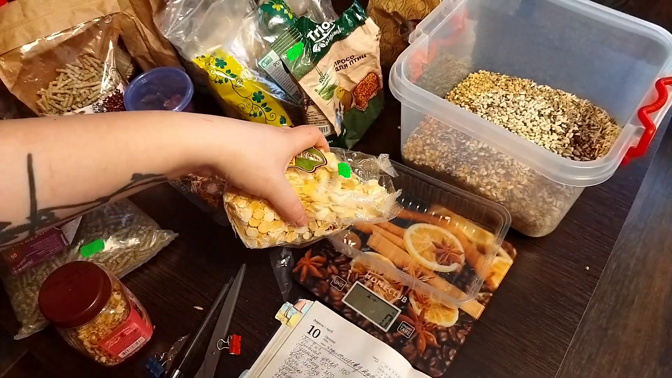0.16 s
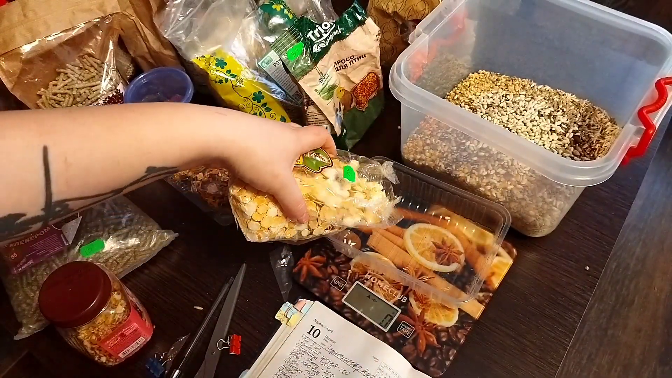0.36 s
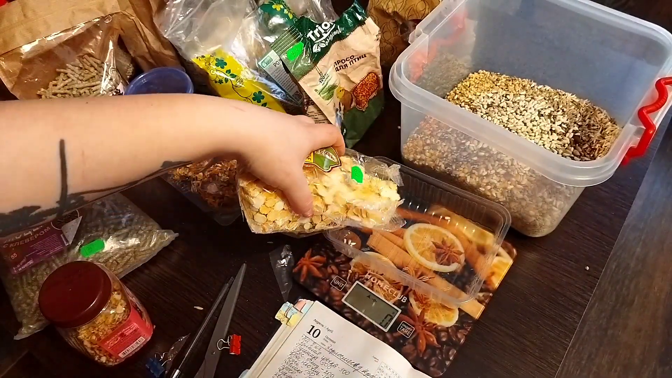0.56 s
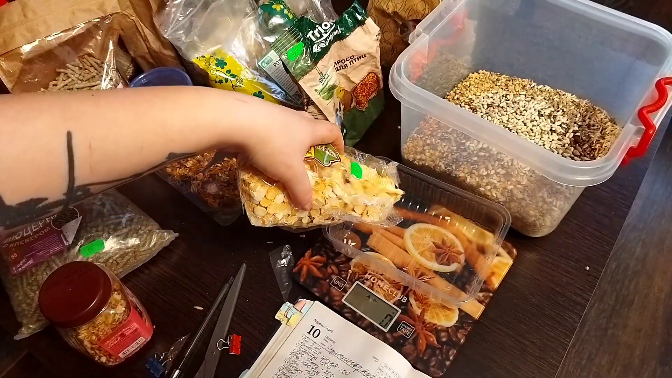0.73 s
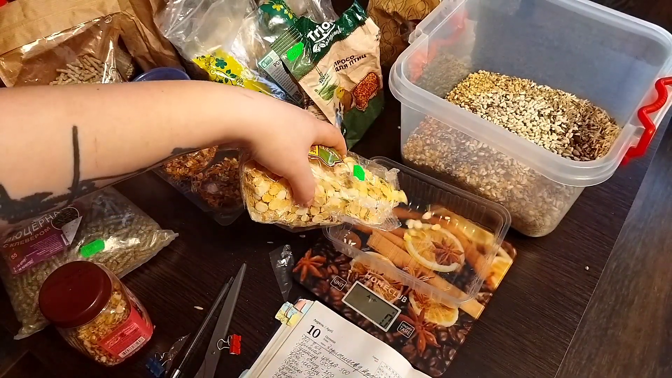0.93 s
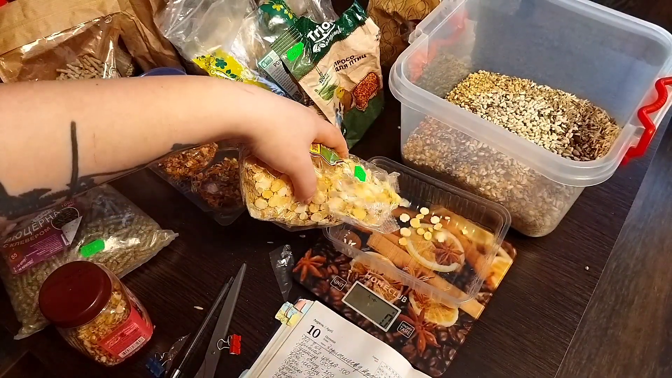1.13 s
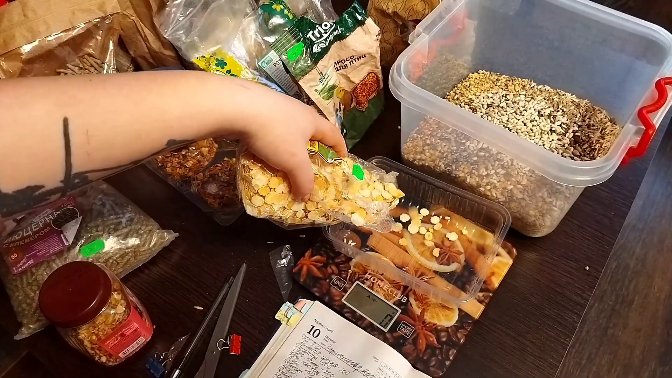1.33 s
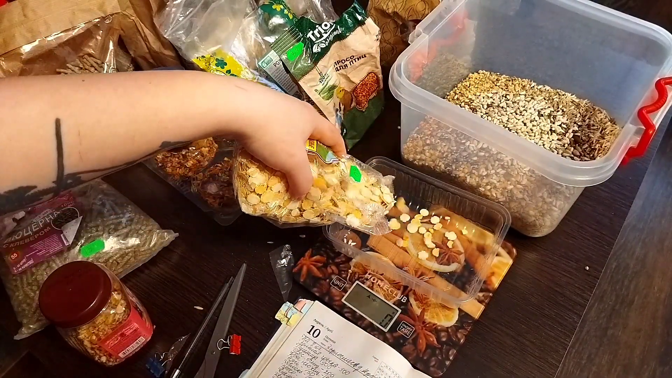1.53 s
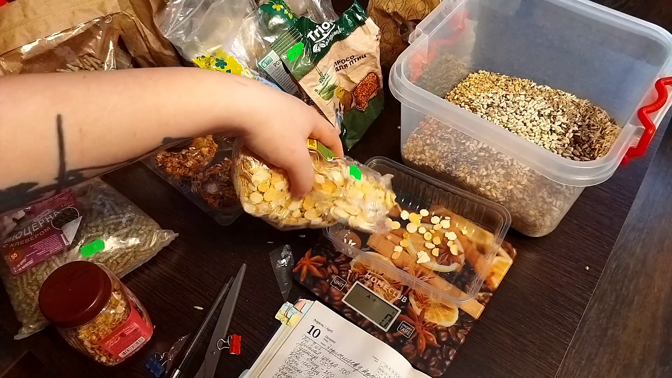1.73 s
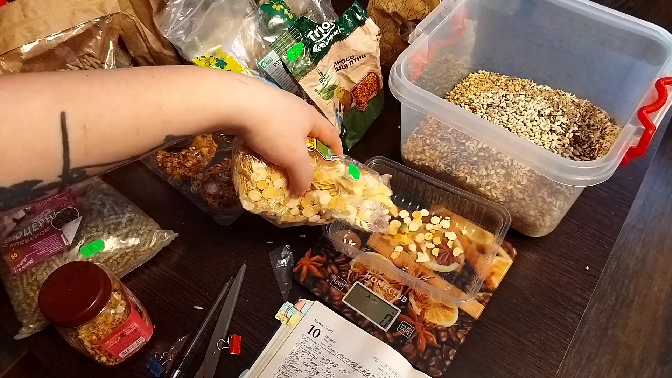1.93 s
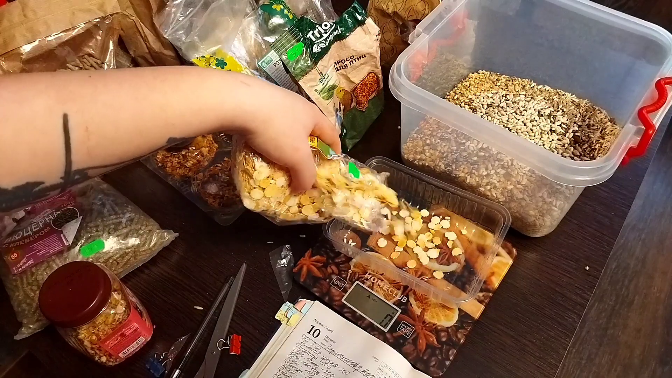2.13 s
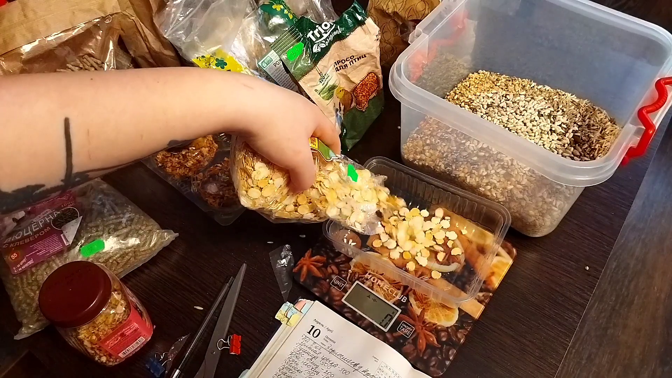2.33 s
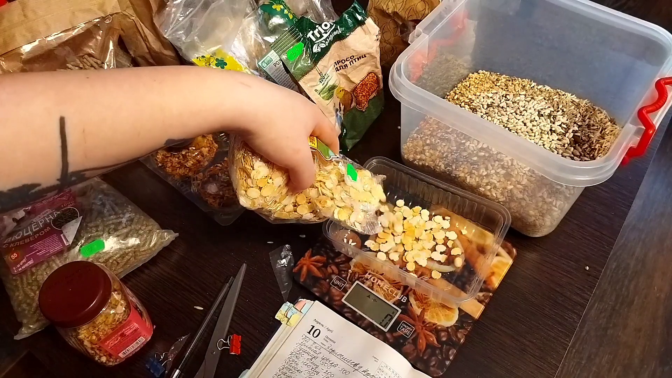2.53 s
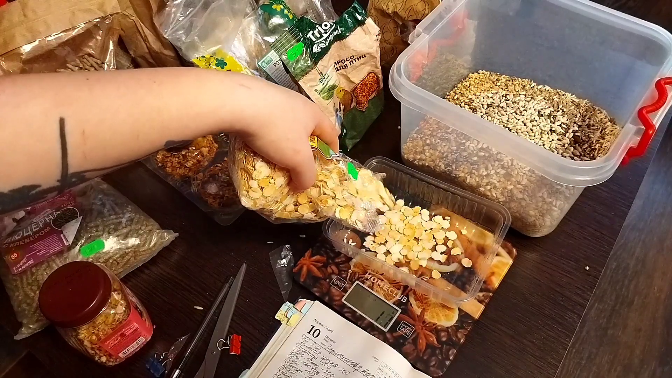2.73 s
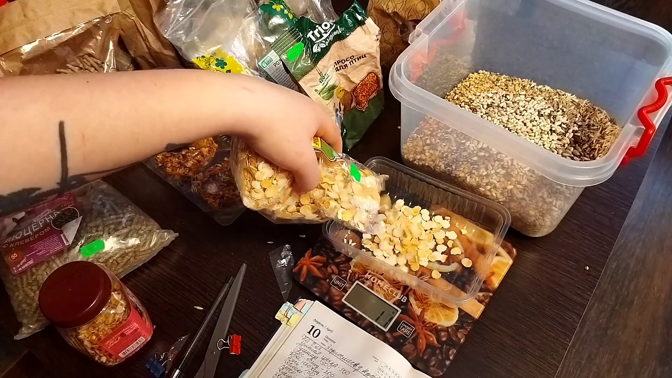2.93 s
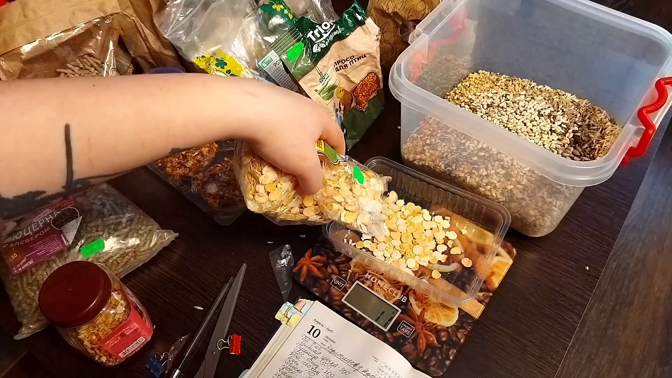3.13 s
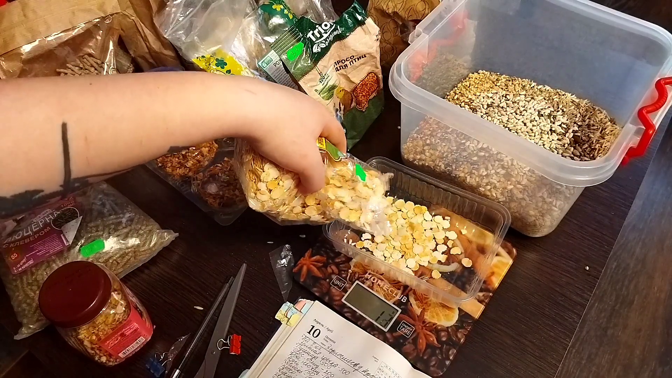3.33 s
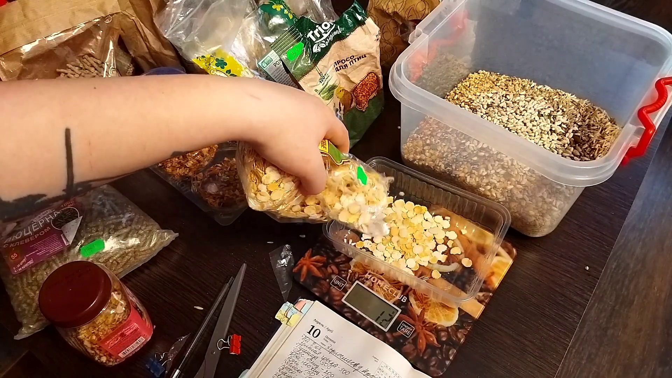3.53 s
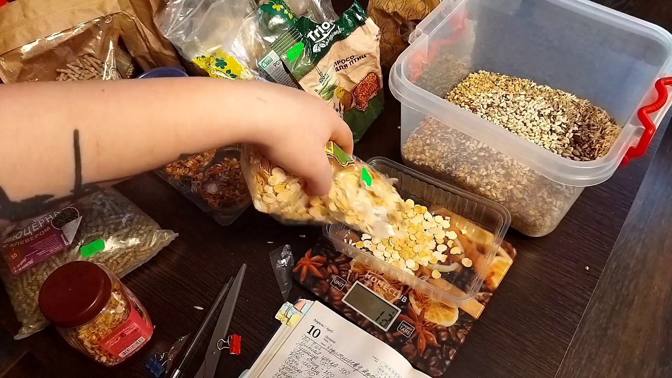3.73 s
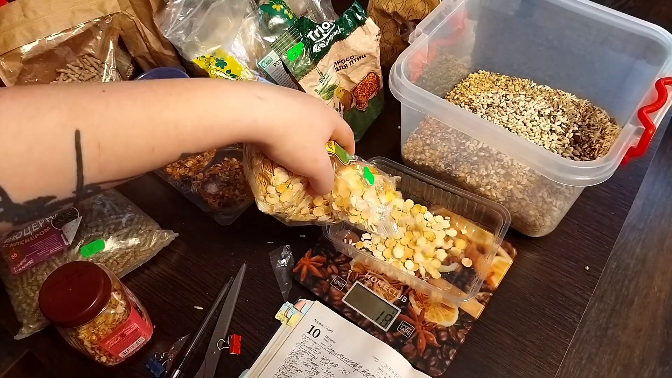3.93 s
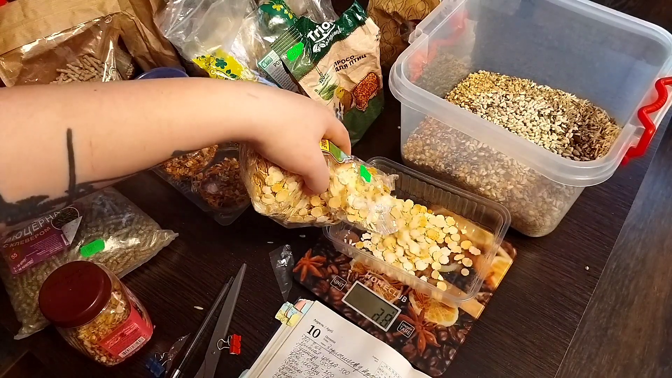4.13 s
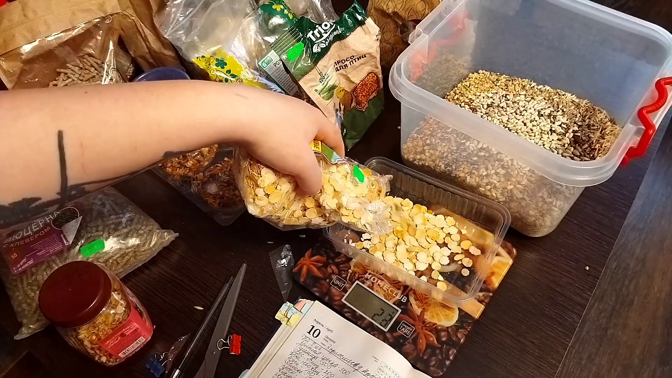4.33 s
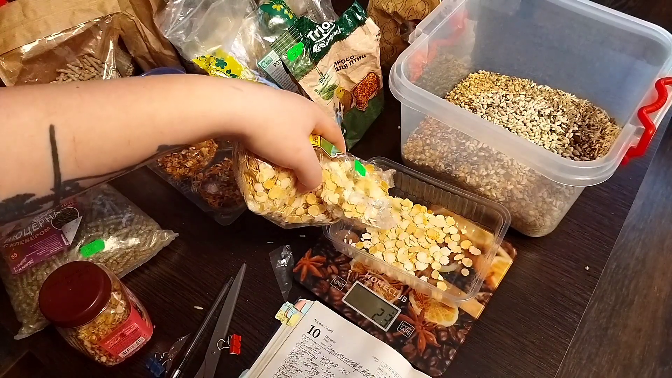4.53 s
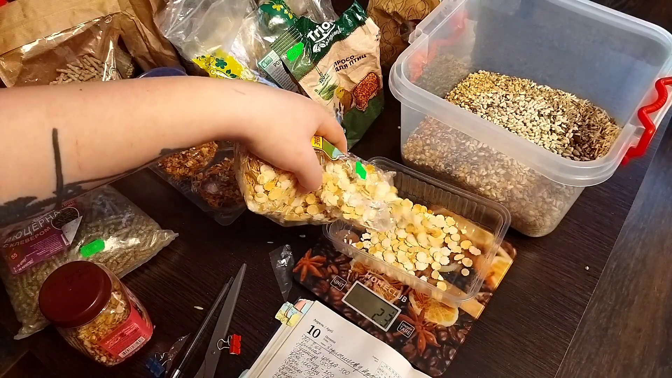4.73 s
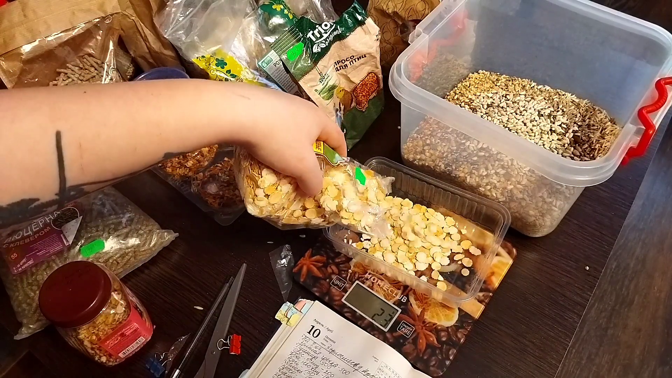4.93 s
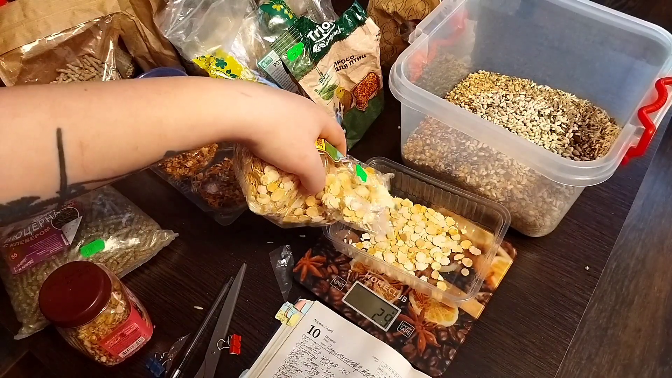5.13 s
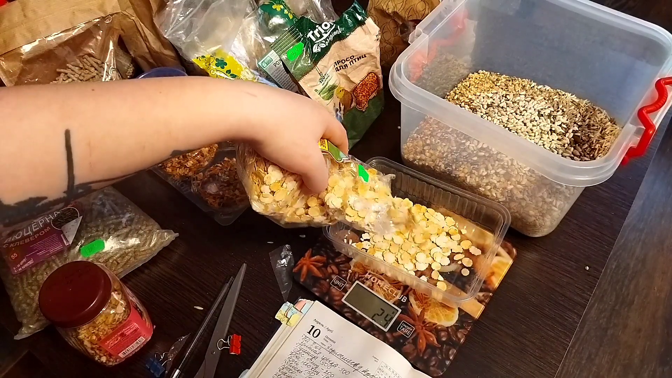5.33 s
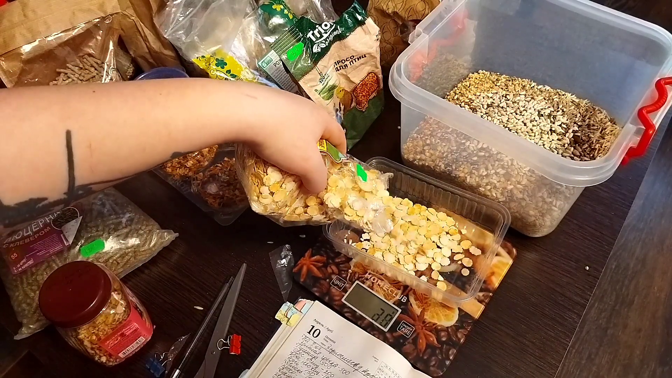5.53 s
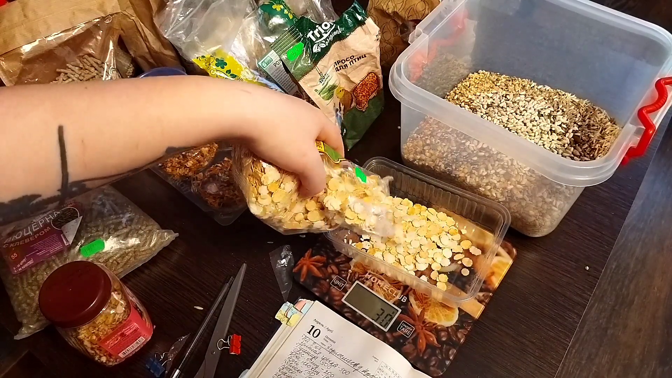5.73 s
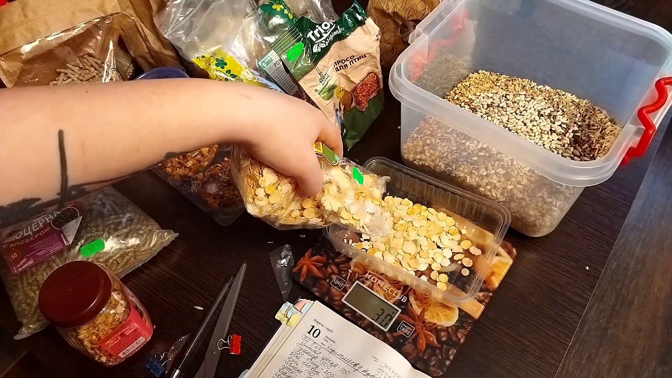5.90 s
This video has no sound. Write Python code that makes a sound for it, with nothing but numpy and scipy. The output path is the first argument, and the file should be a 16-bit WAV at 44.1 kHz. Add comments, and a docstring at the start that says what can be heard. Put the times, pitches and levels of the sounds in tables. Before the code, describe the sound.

Dry flakes are shaken from a stiff, crinkly plastic bag into a thin plastic tray, heard close up in stereo in a small room with a short, diffuse reverberation. For the first 0.9 seconds the sound is quiet: light snaps, a thin trickle of crackle, flakes shifting dully inside the bag and a few soft low bumps. At about 0.9 seconds hard shaking begins with a tight cluster of loud, dry snaps. Irregular bursts follow, each with sharp clicks of film and landing flakes and a surge of fine crackle that holds briefly and dies away, densest from about 1.9 to 2.8 seconds. After 3 seconds the snaps thin out, with a smaller swell near 3.8 to 4.2 seconds. From 4.3 to 6 seconds only weak, brighter crinkles and occasional small ticks remain. Faint steady noise lies underneath throughout.

```python
"""A hand tips and squeezes a stiff plastic bag, shaking dry flakes into a thin plastic tray in a small room.
Over faint noise and a thin trickle of crackle, flakes shift dully inside the bag and the first light snaps and
soft bumps come. From about one second, hard shakes bring loud snaps of film and landing flakes, and each sets off
a surge of fine crackle that holds and dies away; after three seconds the snaps thin out and the surges weaken.
Contacts are shaped noise bursts with a pitch of their own; shifting and bumps are muffled and band-passed noise."""
import sys
import numpy as np
from scipy import signal
from scipy.fft import rfft, irfft
from scipy.io import wavfile
from scipy.ndimage import uniform_filter1d

SR = 44100
rng = np.random.default_rng(int(sys.argv[2]) if len(sys.argv) > 2 else 0)


def dump_mix(stems):
    """Bounce the given channels to the path in sys.argv[1] as a 16-bit WAV at rate SR."""
    frames = np.atleast_2d(stems).T  # one column per channel
    limited = np.clip(frames, -1, 1)  # hard clip at full scale
    pcm = np.round(limited * 32767).astype(np.int16)
    wavfile.write(sys.argv[1], SR, pcm)


N = 262918
TIME = np.arange(N) / SR
SPOTS = 4   # places on bag and tray where contacts happen


def from_db(db):
    """Decibels to gain."""
    return 10 ** (np.asarray(db) / 20)


def rms_one(x):
    """Scale to unit power."""
    return x / np.sqrt(np.mean(x ** 2) + 1e-20)


def at_hz(points, hz):
    """Read a curve over frequency on a log-frequency axis."""
    known_hz, values = np.transpose(points)
    return np.interp(np.log(np.maximum(hz, 1)), np.log(known_hz), values)


def coloured(x, spectrum, size=2048):
    """Causal (minimum-phase) filter of the given colour; white noise keeps its power."""
    gain = rms_one(from_db(at_hz(spectrum, np.fft.rfftfreq(size, 1 / SR))))
    # folding the cepstrum onto positive times makes the filter minimum-phase
    cepstrum = irfft(np.log(gain)) * (1 + np.sign(np.fft.fftfreq(size)))
    response = irfft(np.exp(rfft(cepstrum)))
    return signal.oaconvolve(x, response[None], axes=1)[:, :N]


def resonate(x, modes):
    """Each resonance lifts its own band and rings on briefly."""
    for hz, width_hz, db in modes:
        b, a = signal.iirpeak(hz, hz / width_hz, fs=SR)
        x = x + (from_db(db) - 1) * signal.lfilter(b, a, x)
    return x


def stereo_noise(shape, alike):
    """Left and right white noise with a given correlation."""
    shared, *own = rng.standard_normal((3, *shape))
    alike = np.clip(alike, 0, 1)
    return np.sqrt(alike) * shared + np.sqrt(1 - alike) * np.array(own)


# Colour of the steady background noise. Each row: frequency in Hz, relative level in dB.
BACKGROUND_COLOUR = [(25, -5), (50, -11), (100, -2), (300, -8.5), (1000, -3), (4000, -37), (16000, -13.5)]


def background_noise(level_db):
    """Steady coloured noise, only slightly alike on the two sides."""
    return from_db(level_db) * coloured(stereo_noise((N,), alike=0.23), BACKGROUND_COLOUR)


# Surges of crackle, one per shake or squeeze.
# Each row: start in seconds, level in dB before trim, hold in seconds, brightness in dB per octave.
SHAKE_SURGES = [(0.02, -47, 0.018, -3.5), (0.095, -39, 0.05, -3), (0.348, -49, 0.047, -2),
                (0.439, -49, 0.1905, -0.5), (0.665, -43, 0.016, 1), (0.774, -51, .08, -0.5),
                (0.963, -32, .075, -1.5), (1.115, -39, 0.0503, -4.5), (1.2, -37.5, .06, -0.5),
                (1.355, -37, 0.0452, 1), (1.477, -44, 0.029, -4.5), (1.583, -30, 0.023, 1),
                (1.698, -30, 0.026, 0), (1.795, -42, 0.0654, 2), (1.90, -42, .07, 0),
                (1.985, -25, 0.039, 0.5), (2.148, -41, .02, -3), (2.185, -33, 0.031, 0),
                (2.247, -28, 0.024, 1.5), (2.315, -24, 0.071, 2), (2.44, -30, .08, 1.5),
                (2.56, -34, .1, 1.5), (2.685, -38.5, .14, 0), (2.926, -29, 0.0797, 2.5),
                (3.05, -31, .055, 1), (3.198, -42, 0.029, 0), (3.3, -42, 0.039, 0), (3.375, -41, 0.0512, 0),
                (3.476, -47, 0.018, 3.5), (3.595, -40, 0.0703, 4), (3.69, -39, .04, -0.5),
                (3.775, -39, .04, -0.5), (3.835, -35, .15, 1.5), (3.99, -31.5, .09, 2),
                (4.155, -36, 0.061, 2), (4.3, -43, .12, 1.5), (4.471, -45, 0.025, 3.5),
                (4.565, -45, .03, 1), (4.699, -46.5, 0.018, 4), (4.815, -41, 0.084, 3),
                (5.026, -36, .04, 1), (5.13, -48, 0.034, 0), (5.33, -39.5, 0.038, 5),
                (5.395, -41, .08, 3.5), (5.51, -46, .04, 5), (5.618, -42, .04, 2), (5.692, -45, 0.019, -1),
                (5.755, -46, 0.018, -0.5), (5.835, -40, 0.0275, 1.5)]
SURGE_RISE_S, SURGE_FALL_DB_PER_S = .012, 140
TRICKLE_DB, TRICKLE_TILT_DB = -55, 0.5   # the bag creeps and a few flakes drop between shakes


def flow():
    """Level and brightness of the stream: each shake swells quickly, holds and dies away, over a thin trickle."""
    power = np.full(N, from_db(TRICKLE_DB) ** 2)
    weighted_tilt = TRICKLE_TILT_DB * power
    for start, db, hold_s, tilt_db in SHAKE_SURGES:
        first = int(start * SR)
        span = slice(first, first + SR)
        age = TIME[span] - start
        rise = np.clip(age / SURGE_RISE_S, 0, 1)
        fall_db = SURGE_FALL_DB_PER_S * np.maximum(age - hold_s, 0)
        surge = (rise * from_db(db - fall_db)) ** 2
        power[span] += surge
        weighted_tilt[span] += tilt_db * surge
    return 10 * np.log10(power), weighted_tilt / power


def ticks(s, db, tilt_db, decay_s, ring_hz, ring_db, alike, ragged_db, rise_s, size, lead_count=24):
    """Each contact is a sudden flutter of thin, stiff material that dies in milliseconds."""
    age = np.maximum(np.arange(size) - lead_count, 0) / SR
    fade = (1 - np.exp(-age / rise_s)) * np.exp(-age / decay_s[:, None])
    # a fold gives way in several uneven jerks
    jerks = rms_one(uniform_filter1d(rng.standard_normal(fade.shape), size=30))
    burst = stereo_noise(fade.shape, alike) * fade * from_db(ragged_db * jerks)
    # level the energy of each burst to suit its decay
    energy = (burst ** 2).sum(-1).mean(0)
    burst *= np.sqrt(decay_s * SR / 2 / energy)[:, None]
    hz = np.fft.rfftfreq(size, 1 / SR)
    octaves = np.log2(np.clip(hz, 1000, 14000) / 3800)   # brightness pivots here
    # each facet or flake favours a pitch set by its size
    ring = ring_db * np.exp(-(np.log2((hz + 1) / ring_hz[:, None]) / .5) ** 2)
    spectra = rfft(burst) * from_db(db[:, None] + tilt_db[:, None] * octaves + ring)
    # the sound tends to reach the left port a little later
    delay_s = rng.normal(5.4e-5, 2e-5, (len(s), 1))
    spectra[0] *= np.exp(-2j * np.pi * hz * delay_s)
    where = (s[:, None] * SR).astype(int) + np.arange(size) - lead_count
    where = np.maximum(where, 0).ravel()
    return np.array([np.bincount(where, side.ravel(), N)[:N] for side in irfft(spectra)])


# Colour of the fine crackle. Each row: frequency in Hz, relative level in dB.
FINE_COLOUR = [(100, -31), (250, -17.5), (550, -13), (750, 2.5), (1300, 2), (1800, -4.5), (2300, -1.5),
               (3200, -3), (4500, -2.5), (5400, -7), (7500, -10.5), (10000, -6.5), (16000, -10.5)]
# tiny contacts over all spots at that flow; the rise in flow that doubles them
CONTACTS_PER_S, AT_FLOW_DB, DOUBLING_DB = 1800, -30, 8


def crackle(flow_db, flow_tilt_db, gain_db, spread_db, decay_s):
    """Countless small creases and flakes at one spot, each with a size, brightness and ring of its own."""
    per_s = CONTACTS_PER_S * 2 ** ((flow_db - AT_FLOW_DB) / DOUBLING_DB)
    at = rng.random(N) < per_s / SPOTS / SR
    size, colour, length, pitch = np.clip(rng.standard_normal((at.sum(), 4)), -1.7, 1.7).T
    # the power of the stream is shared among its contacts
    share = rms_one(from_db(spread_db * size)) / np.sqrt(per_s[at] * decay_s / 2)
    db = flow_db[at] + gain_db + 20 * np.log10(share)
    tilt_db = flow_tilt_db[at] + 1.03 * colour
    decays_s = decay_s * from_db(1.9 * length)
    grains = ticks(TIME[at], db, tilt_db, decays_s, 4000 * 2 ** pitch, ring_db=7.0,
                   alike=0.47, ragged_db=3.5, rise_s=0.000071, size=192)
    return coloured(grains, FINE_COLOUR)


# Fader ride for the flakes shifting inside the bag. Each row: time in seconds, level in dB before swing and trim.
SHIFT_LEVEL = [(0.0, -57), (0.55, -58.5), (0.7, -61.5), (0.93, -62), (1.09, -64), (1.51, -60),
               (2.22, -54.5), (3.42, -63.5), (3.68, -57), (3.9, -55.5), (4.6, -66.5), (5.24, -62.5),
               (5.66, -67.5), (5.96, -67)]
# Dull colour of that shifting. Each row: frequency in Hz, relative level in dB.
MUFFLED_COLOUR = [(40, -19), (100, -18), (185, -14.5), (270, -4), (430, -2), (600, -6), (900, -19.5),
                  (1500, -4.5), (2600, -5.5), (5000, -19.5), (16000, -18)]
# share of each surge's swing that the shifting follows; the time it is judged over
SHIFT_FOLLOWS, SWING_SPAN_S = 0.36, 0.63


def shifting(flow_db, gain_db, lumpy_db):
    """Flakes slide over each other inside the bag in small muffled lumps, more with every shake."""
    swing_db = flow_db - uniform_filter1d(flow_db, size=int(SWING_SPAN_S * SR))
    s, ride_db = np.transpose(SHIFT_LEVEL)
    level = from_db(np.interp(TIME, s, ride_db) + SHIFT_FOLLOWS * swing_db + gain_db)
    wander = rms_one(uniform_filter1d(rng.standard_normal(N), size=300))
    lumps = rms_one(from_db(lumpy_db * wander))
    return coloured(stereo_noise((N,), alike=1.0) * lumps * level, MUFFLED_COLOUR)


# lesser snaps come at random over all spots and are as strong as the flow allows
STRAYS_PER_S, STRAY_ABOVE_FLOW_DB, STRAY_SPREAD_DB, STRAY_DECAY_S = 20, 7.5, 5.5, .0012
STRAY_RING_HZ, STRAY_RING_OCTAVES = 2820, 1   # centre and spread of the pitch that a lesser snap favours


def stray_snaps(flow_db, flow_tilt_db):
    """Rows for the lesser snaps at one spot, taking strength and brightness from the flow."""
    at = rng.random(N) < STRAYS_PER_S / SPOTS / SR
    size, colour, pitch = rng.uniform(-0.95, 1, (3, N))[:, at]
    db = flow_db[at] + STRAY_ABOVE_FLOW_DB + STRAY_SPREAD_DB * size
    tilt_db = flow_tilt_db[at] + 0.83 * colour - 0.8
    ring_hz = STRAY_RING_HZ * 2 ** (STRAY_RING_OCTAVES * pitch)
    return np.c_[TIME[at], db, tilt_db, np.full(len(db), STRAY_DECAY_S), ring_hz]


# The loudest snaps of the film and flakes hitting the tray, dealt out over the spots by scene().
# Each row: start in seconds, level in dB before trim, brightness in dB per octave, decay in seconds, own ring in Hz.
LOUD_SNAPS = [(0.023, -24, 4, 0.0014, 2200.0), (0.0993, -22, 7, 0.0014, 1190),
              (0.277, -36, -4, 0.0021, 2100.0), (0.3626, -34.5, -6, 0.0009, 12130),
              (0.3808, -33, -4, 0.0019, 1605), (0.4841, -40, -11, 0.0022, 900.0),
              (0.5168, -34, 6.5, 0.00092, 11050), (0.6716, -32, 4, 0.0025, 1603),
              (0.9202, -16.5, -3.5, 0.0019, 3820), (0.9326, -25, -7.5, 0.0011, 4074),
              (0.9471, -15.5, 2.5, 0.0012, 1802), (0.9707, -16.5, -1.5, 0.0048, 5586),
              (0.9836, -10, 0.5, 0.0023, 1300.0), (1.0159, -11.5, -3, 0.00089, 6500.0),
              (1.0354, -13.5, 1.0, 0.0044, 1010), (1.1107, -23, 1, 0.0019, 4400.0),
              (1.1253, -8.5, -1.5, 0.00086, 1095), (1.1422, -9.5, 3.0, 0.0008, 1110),
              (1.2202, -22, -2, 0.0043, 3460), (1.2535, -17, 3.5, 0.00085, 6480),
              (1.327, -21, 0, 0.0034, 3720), (1.3638, -17, 0, 0.0015, 12930),
              (1.3828, -11.5, -2.5, 0.00052, 7030), (1.4403, -20.5, 0, 0.0017, 2810),
              (1.4773, -14, -2.0, 0.0015, 1160), (1.5426, -21, -1, 0.00086, 5560),
              (1.5594, -14.5, 0.5, 0.0013, 695.5), (1.5868, -7.5, 2, 0.0012, 800.0),
              (1.6522, -24, 0.0, 0.0011, 2200.0), (1.6673, -12.5, -1.0, 0.0011, 6520),
              (1.7037, -11.5, -2, 0.0013, 13980), (1.7184, -16.5, -0.5, 0.0045, 695),
              (1.8107, -22.5, 1.5, 0.004, 3000.0), (1.9444, -17, -1, 0.0015, 1593),
              (1.9562, -12, -1.0, 0.00074, 4400.0), (1.9804, -19, 0.5, 0.007, 2409),
              (1.9939, -14.5, -1.5, 0.0047, 2826), (2.0031, -9.5, 0.0, 0.00096, 5600.0),
              (2.0222, -17.5, 2, 0.0035, 3540), (2.0425, -19, 1.0, 0.0016, 700.0),
              (2.1557, -12.5, -0.5, 0.0009, 2410), (2.1904, -12.5, 2.5, 0.0016, 900.0),
              (2.2009, -12, -1.5, 0.0012, 1602), (2.2502, -16.5, 2, 0.0038, 1490),
              (2.2635, -18.5, 1.5, 0.0033, 3540), (2.3149, -20.5, 2.5, 0.0038, 4400.0),
              (2.3556, -12.5, 0.0, 0.0038, 796.6), (2.4038, -14.5, -4.5, 0.0016, 13000.0),
              (2.4435, -18, -1, 0.0037, 803), (2.61, -16.5, -1.5, 0.0011, 1907),
              (2.643, -16, 0.5, 0.0018, 900.0), (2.7255, -13, -2.5, 0.0016, 698.4),
              (2.7691, -15.5, 1.5, 0.0012, 1600.0), (2.8144, -19.5, 0.5, 0.0057, 2102),
              (2.9295, -21.5, 1.0, 0.0041, 1900.0), (3.0126, -25, -2, 0.003, 4086),
              (3.0657, -21, 0.0, 0.005, 2060), (3.2161, -18, -1.0, 0.001, 895),
              (3.3066, -19.5, 1.5, 0.0019, 1796), (3.4325, -24, -0.5, 0.0012, 14060),
              (3.5643, -26.5, 2.5, 0.0011, 2808), (3.8389, -21, -1, 0.0026, 1900.0),
              (3.898, -24.5, -1.5, 0.0019, 1000.0), (3.9153, -16.5, 2, 0.00084, 6498),
              (4.0201, -21.5, 4, 0.0037, 3476), (4.2759, -33, 3, 0.0022, 800.0),
              (4.3923, -30, 2.5, 0.0019, 702.5), (4.572, -30.5, 0.5, 0.0053, 795),
              (4.8232, -29.5, -2, 0.0053, 1000.0), (4.9849, -33, 0.5, 0.0063, 12080),
              (5.0678, -28, 3.5, 0.003, 799.5), (5.1369, -41.5, -6, 0.0027, 1902),
              (5.2547, -33, -1.5, 0.004, 14000.0), (5.703, -33.5, -1.5, 0.0029, 8265),
              (5.7601, -40.5, 7.5, 0.0051, 698), (5.8367, -26.5, 6, 0.0012, 1513),
              (5.8909, -39, -6.5, 0.0027, 1900.0)]
# Colour of the snaps. Each row: frequency in Hz, relative level in dB.
SNAP_TONE = [(100, -41), (250, -24), (550, -13.5), (750, -8.5), (1300, -2), (1800, -3.5), (2300, 0),
             (3200, -3.5), (4500, 0.5), (5400, -5.5), (7500, -7), (10000, -3.5), (16000, -10.5)]


def snaps(rows, gain_db, crease_db, crease_s, warning_s, count=4):
    """Loud buckles and single landings; one small crease gives way just before each, the others just after."""
    s, db, tilt_db, decay_s, ring_hz = np.transpose(rows)
    main = ticks(s, db + gain_db, tilt_db, decay_s, ring_hz, ring_db=6.0,
                 alike=0.36, ragged_db=3.5, rise_s=0.00019, size=1024)
    s, db, tilt_db, decay_s, ring_hz = np.repeat(rows, count, axis=0).T
    after_s = crease_s * rng.exponential(1, len(s))
    # the first crease of each group is the early, softer one
    after_s[::count] = -warning_s * rng.uniform(.5, 1.5, len(rows))
    db[::count] -= 2.0
    creases = ticks(s + after_s, db + crease_db, tilt_db, np.full(len(s), .0007), ring_hz, ring_db=-2.5,
                    alike=0.99, ragged_db=2.5, rise_s=0.00017, size=192)
    return coloured(main + creases, SNAP_TONE)


# Soft bumps of the full bag. Each row: start in seconds, peak level in dB before trim, pitch in Hz.
BAG_BUMPS = [(0.135, -36, 340), (0.48, -39, 494), (0.98, -40, 437), (1.186, -38, 321.7),
             (1.71, -37.5, 476.4), (2.105, -48, 278), (2.194, -39, 380), (3.462, -44, 317),
             (3.71, -40, 456.6), (3.784, -40, 350), (5.192, -48, 350), (5.344, -39, 354.4)]


def bumps(gain_db, octaves, decay_s):
    """A whole face of the bag flexes against the flakes: a short, low puff."""
    out = np.zeros(N)
    age = TIME[:SR // 10] / decay_s
    for s, db, hz in BAG_BUMPS:
        edges_hz = hz * 2 ** (octaves * np.array([-.5, .5]))
        band = signal.butter(2, edges_hz, "band", fs=SR, output="sos")
        puff = signal.sosfilt(band, rng.standard_normal(len(age)) * np.sqrt(age) * np.exp(-age))
        out[int(s * SR):][:len(age)] += from_db(db + gain_db) * puff / np.abs(puff).max()
    return out


# Reverb time of the small room. Each row: frequency in Hz, time to fall by 60 dB in seconds.
REVERB_TIME = [(150, 0.46), (1000, 0.2), (4000, 0.58), (9000, 0.043), (16000, 0.29)]


def room(x, wet_db, table_db, build_s=0.0016):
    """The direct sound, quick reflections off the table, then a diffuse tail, each band dying at its own rate."""
    age = TIME[:SR // 3]
    hz = np.fft.rfftfreq(len(age), 1 / SR)
    centres = np.geomspace(150, 16000, 6)
    tail = 0
    for centre, pick in zip(centres, np.eye(len(centres))):
        # long waves reach both ports alike
        noise = rfft(stereo_noise(age.shape, alike=1 / (1 + (centre / 900) ** 2)))
        band = irfft(noise * np.sqrt(at_hz(np.c_[centres, pick], hz)), len(age))
        tail = tail + band * from_db(-60 * age / at_hz(REVERB_TIME, centre))
    tail = rms_one(tail * (1 - np.exp(-age / build_s)))
    near = rms_one(stereo_noise(age.shape, alike=0.033) * age * np.exp(-age / 0.0024))
    response = (from_db(wet_db) * tail + from_db(table_db) * near) / np.sqrt(len(age))
    return x + signal.oaconvolve(x, response, axes=1)[:, :N]


# Resonances of the tray and the bag. Each row: frequency in Hz, width in Hz, lift in dB.
PLASTIC_MODES = [(469.8, 32, 7.5), (740, 66, 6), (833, 16, 4), (1276, 23, 0), (1297, 26, 2.5),
                 (1630, 63, 3.5), (2123, 50, 3.5), (3257, 57, 4), (3470, 24, 6.5), (4400, 1150, 3.5)]


def scene():
    """Contacts are spread over several spots of bag and tray, each with its own reflections."""
    flow_db, flow_tilt_db = flow()
    contacts = 0
    for spot in range(SPOTS):
        rows = np.vstack([LOUD_SNAPS[spot::SPOTS], stray_snaps(flow_db, flow_tilt_db)])
        loud = snaps(rows, gain_db=-3.5, crease_db=-12.5, crease_s=.007, warning_s=0.005)
        fine = crackle(flow_db, flow_tilt_db, gain_db=-7.0, spread_db=5.0, decay_s=0.00094)
        contacts = contacts + room(loud + fine, wet_db=-7.0, table_db=-7.0)
    inside_bag = shifting(flow_db, gain_db=8.0, lumpy_db=4.0)
    inside_bag = inside_bag + bumps(gain_db=-0.5, octaves=1.0, decay_s=0.0074)
    background = background_noise(level_db=-58.5)
    return resonate(contacts, PLASTIC_MODES) + room(inside_bag, wet_db=-8.5, table_db=-8.0) + background


# Resonances of the left and right microphone ports. Each row: frequency in Hz, width in Hz, lift in dB.
LEFT_PORT_MODES = [(268, 110, 2), (1270, 320, 1), (3240, 250, 1), (8930, 920, 7.5)]
RIGHT_PORT_MODES = [(514, 160, 1.4), (3760, 210, 1.3), (6447, 420, 6.45), (12060, 490, 5)]
BASS_CUT_HZ, TOP_CUT_HZ = 112, 16000
PEAK_LIMIT = .9   # full scale is 1


def record(dry):
    """Each microphone port adds its own colour; the deep bass is cut, the highest peaks are rounded, the top is cut."""
    heard = np.array([resonate(dry[0], LEFT_PORT_MODES), resonate(dry[1], RIGHT_PORT_MODES)])
    bass_cut = signal.butter(1, BASS_CUT_HZ, "high", fs=SR, output="sos")
    heard = signal.sosfilt(bass_cut, heard)
    heard = PEAK_LIMIT * np.tanh(heard / PEAK_LIMIT)
    top_cut = signal.ellip(10, .3, 70, TOP_CUT_HZ, fs=SR, output="sos")
    return signal.sosfilt(top_cut, heard)


dry = scene()
out = record(dry)
dump_mix(out)
```